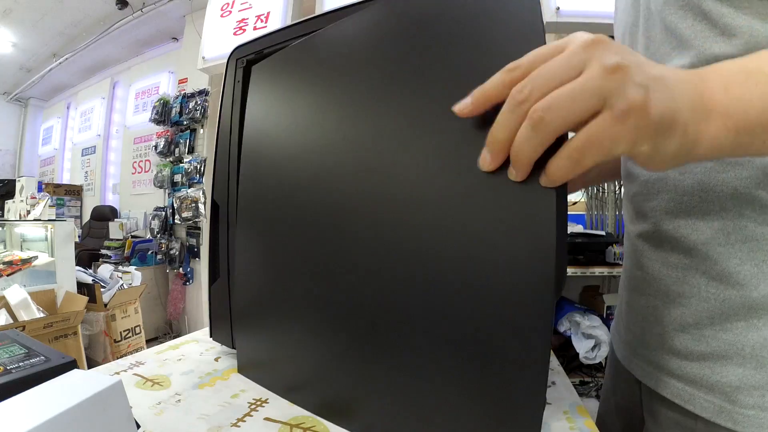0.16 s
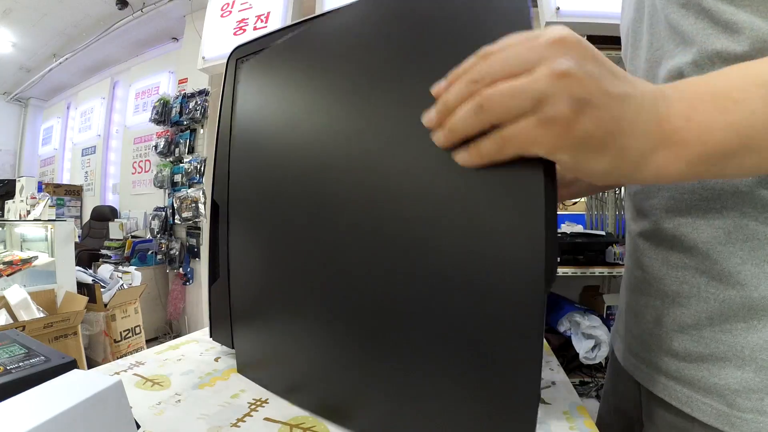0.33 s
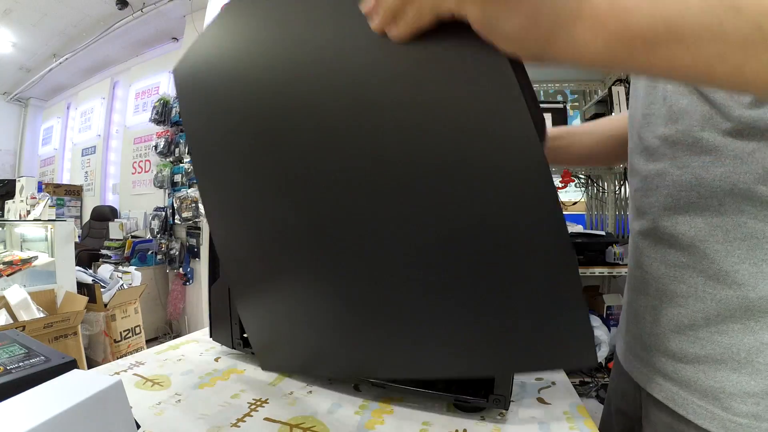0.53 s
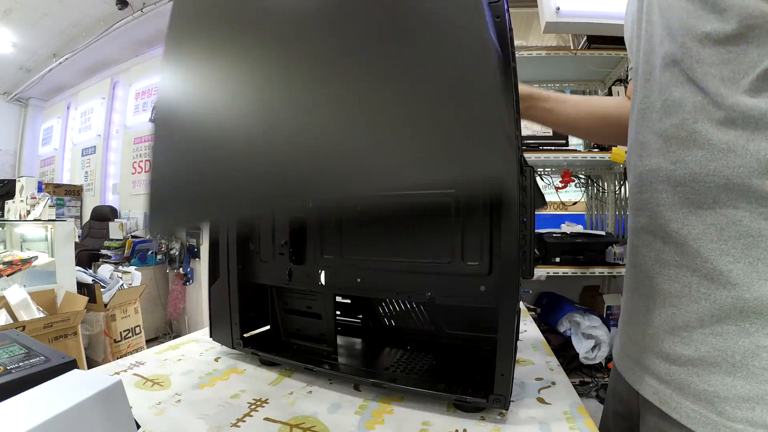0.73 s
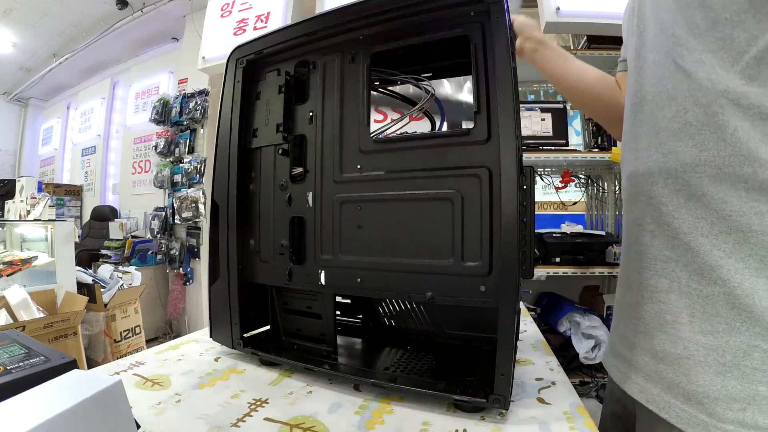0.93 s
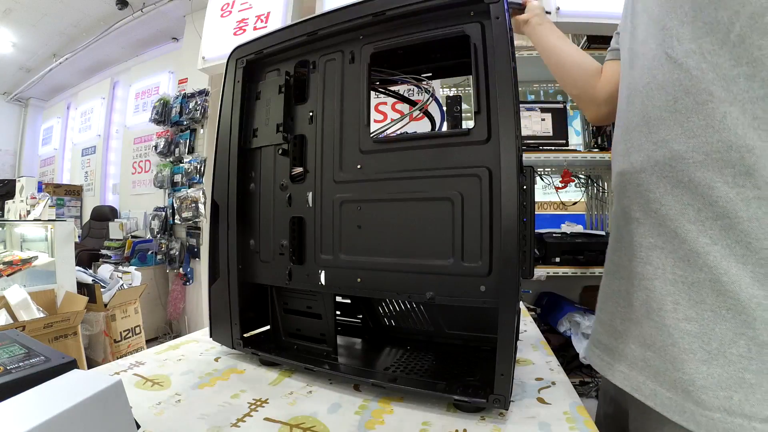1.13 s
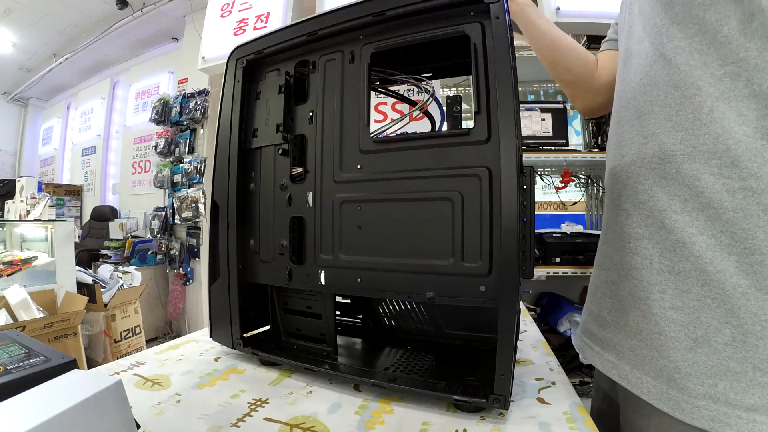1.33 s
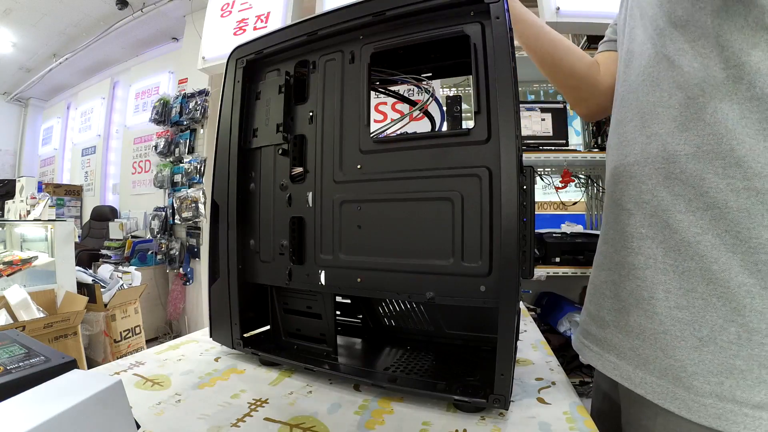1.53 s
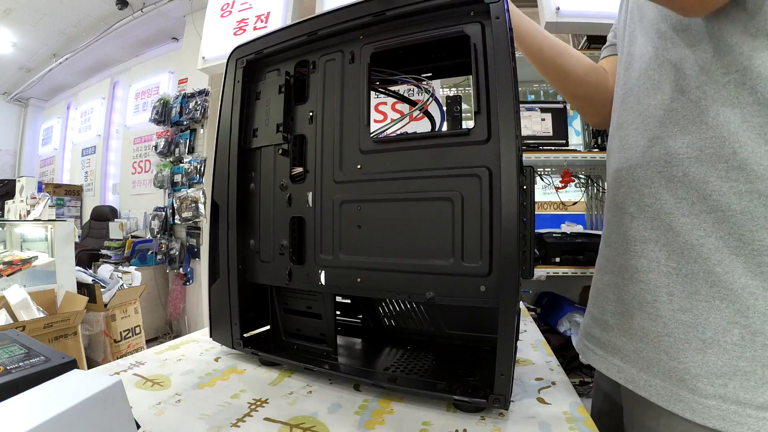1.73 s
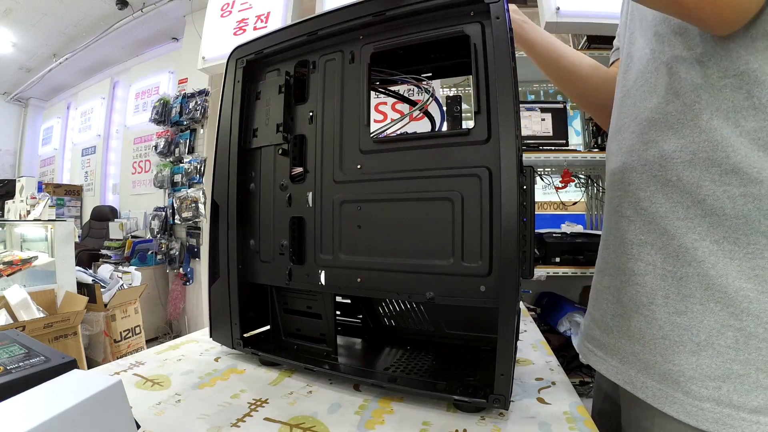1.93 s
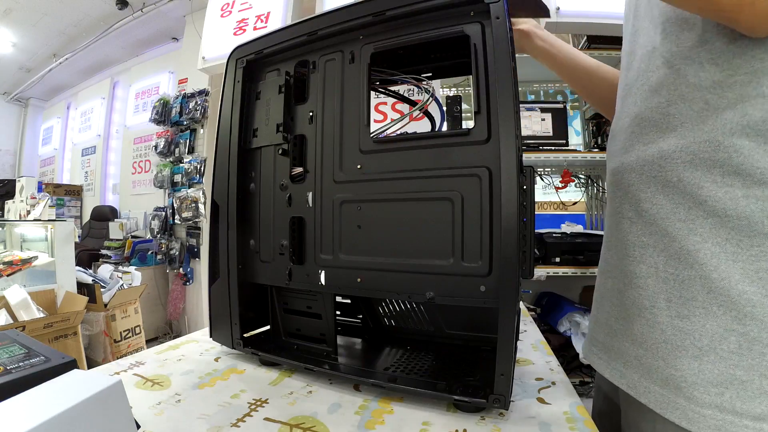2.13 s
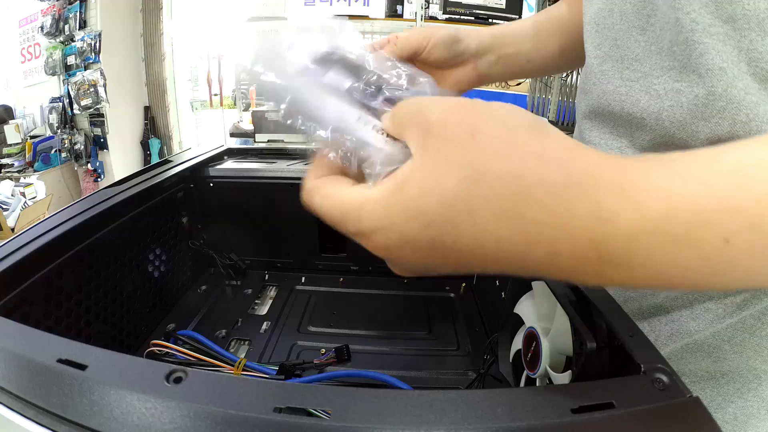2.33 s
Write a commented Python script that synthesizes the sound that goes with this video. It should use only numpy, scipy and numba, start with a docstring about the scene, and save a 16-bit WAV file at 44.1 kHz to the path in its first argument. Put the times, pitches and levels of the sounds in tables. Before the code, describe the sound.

Metal side panel wrenched loose from a hollow case, overloaded bangs up close, later rattling knocks and drag.

```python
"""A sheet-metal side panel is jerked off a computer case close to the microphone: dull thumps that overload it,
a bright clank, a scrape as the edge slides free. Later it is set down further off, with rattling knocks and a drag.
Blows set off a few clear tones plus dense, fading bands of noise; scrapes are irregular clicks through resonances.
Echoes surround panel and knocks, and a quiet workshop rumbles and hisses underneath."""
import sys
import numpy as np
from scipy import signal
from scipy.fft import rfft, irfft
from scipy.io import wavfile
from numba import njit

SR = 44100
rng = np.random.default_rng(int(sys.argv[2]) if len(sys.argv) > 2 else 0)


def materialize(psi):
    """Save the field psi as 16-bit PCM at rate SR to the path in sys.argv[1].

    A 1-D psi becomes a single channel; in a 2-D psi each row is a channel.
    """
    bounded = np.clip(np.atleast_2d(psi).T, -1, 1)
    quanta = np.round(bounded * 32767).astype(np.int16)
    wavfile.write(sys.argv[1], SR, quanta)


N = 104781
T = np.arange(N) / SR  # time of every sample, in seconds

# blows on the panel: start_s, ring_db, contact_ms, dull_thud_db, bright_clank_db, case_thump_db
PANEL_BLOWS = [(0.0, -11.5, 2.37, -21, -27.5, -38), (0.025, -31, 4.5, -27, -36.5, -11.5),
               (0.0947, -26, 0.92, -9.5, -31.5, 9), (0.1361, -23, 1.6, -10.5, -8, -25),
               (0.1769, -8, 1.63, -4.5, -47.5, -4.5), (0.2108, -18.5, 0.66, -4, -35, -2),
               (0.452, -29.5, 0.98, -25.5, -55, -38)]
# setting the panel down: start_s, rattle_db, hollow_knock_db, low_thud_db
SET_DOWN_KNOCKS = [(1.8641, -15, -49, -46), (1.8720, -17.5, -68, -35.5), (1.9206, -22.5, -32.5, -40),
                   (1.927, -22, -53, -26), (1.994, -17, -59, -38), (1.999, -26.5, -33.5, -35),
                   (2.0694, -16, -29, -47), (2.0730, -37, -19.5, -30.5), (2.078, -22, -27.5, -24),
                   (2.350, -32, -73, -35), (2.3582, -35, -41, -43)]
WAVER_HZ = 10.6  # pace at which the panel's ring and the echoes are hurried and delayed
DIP_S, DIP_HALF_S = 2.345, 0.0052  # the level dips to nothing for an instant
GRIT_SPREAD_DB = 2  # scatter of click sizes in slide and drag


def undb(db):
    """Turn decibels into a plain gain."""
    return 10 ** (np.asarray(db) / 20)


def unit(x):
    """Scale a sound to an average strength (rms) of 1."""
    return x / np.sqrt(np.mean(x ** 2))


def fade(seconds, t60):
    """Natural dying away: down by 60 dB after t60 seconds."""
    return np.exp(-np.log(1000) * seconds / t60)


def curve(rows, col=1):
    """One column of a table, joined by straight lines in time."""
    rows = np.array(rows, float)
    return np.interp(T, rows[:, 0], rows[:, col])


def noise():
    """Plain random hiss, equally strong at all pitches."""
    return rng.standard_normal(N)


def band(x, hz, width_hz):
    """Two-pole resonance with gain 1 at its centre."""
    return signal.lfilter(*signal.iirpeak(min(hz, .45 * SR), hz / width_hz, fs=SR), x)


@njit
def sweep(x, hz, width):
    """Resonance whose centre moves; its width is a share of its pitch (state-variable band-pass)."""
    y, b, l = np.empty(len(x)), 0., 0.
    for i in range(len(x)):
        g = np.tan(np.pi * hz[i] / SR)
        v = (b + g * (x[i] - l)) / (1 + g * (g + width))
        b, l, y[i] = 2 * v - b, l + 2 * g * v, width * v
    return y


def clicks(times, db):
    """Single-sample clicks at the given times and levels."""
    x = np.zeros(N)
    places = np.clip((np.asarray(times) * SR).astype(int), 0, N - 1)
    np.add.at(x, places, undb(db))
    return x


def grit(per_s, spread_db):
    """Irregular clicks of scattered size and random direction, rms 1."""
    chance, size = rng.random((N, 2)).T
    happens = chance < per_s / SR
    return unit(happens * undb(-spread_db * np.log(size + 1e-9)) * np.sign(noise()))


def ring(modes):
    """Response of a few clear modes to one push: fading sine tones."""
    return sum(undb(db) * fade(T, t60) * np.sin(2 * np.pi * hz * T) for hz, db, t60 in modes)


def bursts(hits, colour, t60, slope, source):
    """Countless close modes: third-octave bands of the source, started by the hits, each dying at its own rate."""
    colour, out, power = np.array(colour, float), 0, 0
    for hz in 40 * 2 ** np.arange(0, 8.7, 1 / 3):
        level_db = np.interp(np.log(hz), np.log(colour[:, 0]), colour[:, 1], left=-60)
        gain = undb(level_db) * np.sqrt(hz)  # a band grows wider with its pitch
        band_t60 = t60 * (hz / 1000) ** slope  # t60 is given at 1 kHz
        envelope = signal.lfilter([1], [1, -fade(1 / SR, band_t60)], hits)
        grain = unit(band(source(), hz, hz / 3))
        out = out + gain * band(envelope * grain, hz, hz / 2)
        power = power + gain ** 2
    return out / np.sqrt(power)


def panel():
    """Each blow pushes sheet and case for its contact time, so both ring, and sets off a bright clank."""
    # clear tones of the sheet: pitch_hz, level_db, t60_s
    sheet_modes = [(158.8, -6, 0.38), (257, -4.5, 0.63), (334, -7, 0.25), (397.3, -6, 0.31), (575, -6, 0.4),
                   (667, 0, 0.1), (940, -8.5, 0.37)]
    # the hollow case booms briefly: pitch_hz, level_db, t60_s
    case_modes = [(105.3, -11, 0.027), (212.1, 1.5, 0.051), (388, -0.5, 0.043), (584, -3.5, 0.037)]
    # colour of the clank: pitch_hz, level_db_per_hz
    clank_colour = [(400, -12), (700, 4), (1500, 0.5), (2600, 1.5), (3250, -3), (3900, -9), (5000, -8),
                    (9000, -16.5), (15500, -32.5)]
    clank_t60_s, clank_slope = 0.24, -0.0123  # at 1 kHz; power of pitch
    bend_s = 0.00056  # rms shift in time

    blows = np.array(PANEL_BLOWS, float)
    sheet_push, case_push = np.zeros(N), np.zeros(N)
    for start_s, ring_db, contact_ms, _, _, thump_db in blows:
        push = np.hanning(int(contact_ms * SR / 1000) + 3)  # three samples longer, for the soft ends
        push = push / push.sum()
        first = int(start_s * SR)
        sheet_push[first:first + len(push)] -= undb(ring_db) * push
        case_push[first:first + len(push)] -= undb(thump_db) * push
    sheet = signal.fftconvolve(sheet_push, ring(sheet_modes))[:N]
    case = signal.fftconvolve(case_push, ring(case_modes))[:N]
    # the bending sheet hurries and delays its own ring
    bend = bend_s * unit(band(noise(), WAVER_HZ, WAVER_HZ))
    sheet = np.interp(T + bend, T, sheet)
    clank = bursts(clicks(blows[:, 0], blows[:, 4]), clank_colour, clank_t60_s, clank_slope, noise)
    return sheet + case + clank


def flexing():
    """The whole sheet flexes, pumps air and booms where it snaps through: damped swings, inward first. The last
    row is a deep, slow swing that starts as the level dips."""
    # booms, and a deep swing as the level dips: start_s, level_db, pitch_hz, t60_s
    flexes = [(0.096, 2.5, 87, 0.066), (0.133, -0.5, 41.6, 0.22), (0.1764, -1, 339, 0.088),
              (0.2113, 1, 248.6, 0.084), (0.2102, -6, 157, 0.1), (0.241, -9, 240.5, 0.096),
              (0.264, -17, 269.5, 0.22), (0.45, -23, 44.2, 0.47), (0.673, -22, 30.3, 0.19),
              (2.345, -24, 25, 0.91)]
    out = 0
    for start_s, level_db, pitch_hz, t60_s in flexes:
        swing = -np.roll(ring([(pitch_hz, level_db, t60_s)]), int(start_s * SR))
        out = out + swing * (T >= start_s)
    return out


def thuds():
    """Dull dense body of the sheet under every blow and knock; its low modes die slowest."""
    # colour of the thuds: pitch_hz, level_db_per_hz
    thud_colour = [(29, -13), (50, -6.5), (275, 0.5), (369, -6), (639, -9), (1240, -12.5), (1850, -31),
                   (4000, -47)]
    thud_t60_s, thud_slope = 0.11, -0.3  # at 1 kHz; power of pitch
    blows, set_downs = np.array(PANEL_BLOWS, float), np.array(SET_DOWN_KNOCKS, float)
    hits = clicks(blows[:, 0], blows[:, 3]) + clicks(set_downs[:, 0], set_downs[:, 3])
    return bursts(hits, thud_colour, thud_t60_s, thud_slope, noise)


def slide():
    """The edge sticks and slips out of its rail: clicks in a resonance that mostly rises as it comes free."""
    # edge leaving its rail: start_s, level_db, resonance_hz
    path = [(0.422, -78, 560), (0.432, -42.5, 640), (0.449, -43, 900), (0.46, -45.5, 715), (0.50, -37, 880),
            (0.53, -41, 1110), (0.553, -44, 1338), (0.563, -53, 1310), (0.63, -62, 1150)]
    clicks_per_s, width, hiss_db = 3000, .28, -1  # width as a share of the pitch
    slips = grit(clicks_per_s, GRIT_SPREAD_DB)
    pitch = curve(path, col=2)
    tone = unit(sweep(sweep(slips, pitch, 2 * width), pitch, width))
    hiss = undb(hiss_db) * unit(band(band(slips, 730, 1250), 730, 900))
    sliding = (T > path[0][0]) * (T < path[-1][0])
    return sliding * undb(curve(path)) * (tone + hiss)


def ticks():
    """Ticks and short rings: puffs of noise in a narrow or wide band, fading from a sudden start."""
    # puffs: start_s, level_db, pitch_hz, width_hz, t60_s
    puffs = [(0.095, -22, 2200, 1500, .05), (0.1355, -7, 3300, 800, 0.08), (0.451, -33, 1500, 2000, 0.14),
             (0.651, -45, 1570, 300, 0.06), (0.652, -34, 1800, 5000, 0.025), (0.656, -49.5, 280, 60, 0.78),
             (0.936, -45, 3000, 4000, 0.014), (1.661, -45, 6500, 7000, 0.05),
             (2.0694, -18, 5000, 6000, 0.09), (2.0705, -26, 840, 150, 0.08)]
    out = 0
    for start_s, level_db, pitch_hz, width_hz, t60_s in puffs:
        envelope = fade(np.maximum(T - start_s, 0), t60_s) * (T >= start_s)
        grain = unit(band(band(noise(), pitch_hz, 2 * width_hz), pitch_hz, width_hz))
        out = out + undb(level_db) * envelope * grain
    return out


def knocks():
    """Gritty rattle of the sheet being set down: a crack at first contact, then broad resonances."""
    # colour of the rattle: pitch_hz, level_db_per_hz
    rattle_colour = [(150, -16), (450, -6), (640, -7), (770, 5.5), (1310, -7.5), (1480, 0), (4170, -6),
                     (4630, -1), (10400, -17.5), (15500, -50)]
    # broad resonances added to the rattle: pitch_hz, width_hz, level_db
    rattle_peaks = [(760, 120, -4), (1100, 150, -8), (1900, 300, 0), (2800, 400, -2)]
    rattle_t60_s, rattle_slope, spread_db = .06, -.05, 2.0  # at 1 kHz; power of pitch; scatter of clicks
    crack_db, crack_hz, crack_width_hz = 11, 2200, 4000  # level over the rattle

    rows = np.array(SET_DOWN_KNOCKS, float)
    grains = grit(12000, spread_db)
    hits = clicks(rows[:, 0], rows[:, 1])
    rattle = bursts(hits, rattle_colour, rattle_t60_s, rattle_slope, lambda: grains * noise())
    rattle += band(clicks(rows[:, 0], rows[:, 1] + crack_db), crack_hz, crack_width_hz)
    return rattle + sum(undb(db) * band(rattle, hz, width) for hz, width, db in rattle_peaks)


def hollow():
    """A low knock under the rattle: two tones rung by each contact, then stopped short by the hand."""
    # hollow tones: pitch_hz, level_db, t60_s
    hollow_modes = [(200.7, 0.5, 0.18), (143, -6, 0.29)]
    held_s = 0.057  # then the hand stops it
    rows = np.array(SET_DOWN_KNOCKS, float)
    stopped = ring(hollow_modes) * np.exp(-(T / held_s) ** 6)
    return signal.fftconvolve(clicks(rows[:, 0], rows[:, 2]), stopped)[:N]


def drag():
    """Chattering stick-slip clicks into the sheet's resonances; the upper ones swell as it presses harder."""
    # course of the drag: start_s, level_db, brightening_db
    path = [(2.14, -60, -6), (2.17, -43, -8), (2.226, -38, -9), (2.27, -36, -6), (2.294, -34, -5),
            (2.306, -36, 1.5), (2.328, -41, -3), (2.345, -54, 0)]
    # resonances of the dragged sheet: pitch_hz, width_hz, level_db
    peaks = [(893, 320, 3), (1640, 550, 5), (2905, 130, -4.5), (4450, 430, -7)]
    clicks_per_s, chatter_db, hiss_db, low_db = 3000, 1, -5.5, -4.5
    glide_per_s = 1.5  # the first resonance climbs by this share of its pitch each second, for 0.2 s

    chatter = undb(chatter_db * unit(band(noise(), 83, 72)))
    slips = grit(clicks_per_s, GRIT_SPREAD_DB) * chatter
    hz, width, db = peaks[0]
    climb = hz * (1 + glide_per_s * np.clip(T - path[2][0], -.1, .1))
    gliding = undb(db) * unit(sweep(sweep(slips, climb, 2 * width / hz), climb, width / hz))
    low = undb(low_db) * unit(band(band(slips, 420, 270), 420, 270))
    upper = undb(hiss_db) * unit(band(band(noise(), 4100, 5900), 5200, 7900))
    for hz, width, db in peaks[1:]:
        upper = upper + undb(db) * unit(band(band(slips, hz, 2 * width), hz, width))
    dragging = (T > path[0][0]) * (T < DIP_S)
    return dragging * undb(curve(path)) * (gliding + low + undb(curve(path, col=2)) * upper)


def echoes(near, far):
    """Room echoes: a dense fading tail, stronger for far sounds, wavering as panel and hands move."""
    t60_s, slope, near_db, far_db = 0.58, -0.072, -13, -4.5  # t60 at 1 kHz; power of pitch
    drift_s = .00012  # rms shift in time
    tail = bursts(clicks([.004], [0]), [(40, 0), (16000, 0)], t60_s, slope, noise)
    tail = tail / np.sqrt(np.sum(tail ** 2))
    room = signal.fftconvolve(undb(near_db) * near + undb(far_db) * far, tail)[:N]
    drift = drift_s * unit(band(noise(), WAVER_HZ, WAVER_HZ))
    return np.interp(T + drift, T, room)


def shop():
    """Filtered noise: steady hiss and hum of the room, a deep wavering rumble, a faint rustle."""
    # colour of the room: pitch_hz, level_db_per_hz
    room_colour = [(26, -35), (45, 3), (129, -16), (220, -13), (262, -17), (866, -24.5), (2040, -28),
                   (14100, -45), (15500, -42.5)]
    # deep rumble: start_s, level_db
    rumble_level = [(0.5, -35), (2.332, -42.5), (2.37, -37)]
    # treble swells as the hands move: start_s, level_db
    rustle_level = [(0.6, -56), (1.0, -63), (1.14, -54.5), (1.22, -63.5), (1.85, -88)]
    hiss_db, rumble_hz, rumble_width_hz = -48.5, 23.77, 10.8

    pitches, rows = np.fft.rfftfreq(N, 1 / SR), np.array(room_colour, float)
    colour_db = np.interp(np.log(pitches + 1), np.log(rows[:, 0]), rows[:, 1], left=-60)
    hiss = unit(irfft(rfft(noise()) * undb(colour_db), N))
    rumble = unit(band(band(noise(), rumble_hz, rumble_width_hz), rumble_hz, rumble_width_hz))
    rustle = unit(band(noise(), 2500, 4200))
    return undb(hiss_db) * hiss + undb(curve(rumble_level)) * rumble + undb(curve(rustle_level)) * rustle


def scene():
    """Mix all sources, alike on both channels; the flexing booms and the deep swing stay outside the echoes and
    the dip."""
    near = panel() + thuds() + slide() + ticks() + hollow()
    far = knocks() + drag()
    dip = np.clip(np.abs(T - DIP_S) / DIP_HALF_S, 0, 1)
    mono = (near + far + echoes(near, far) + shop()) * dip + flexing()
    return np.array([mono, mono])


def record(dry):
    """One microphone on two channels: its level is cut off flat when overloaded, then the top is filtered away."""
    # steady offset of each channel, one row a channel: offset (full scale is 1)
    offsets = [
        [-.0128],
        [.0054],
    ]
    top_hz = 15700
    overloaded = np.clip(dry + np.array(offsets), -1, 1)
    top_cut = signal.ellip(8, .1, 70, top_hz, fs=SR, output="sos")
    return np.clip(signal.sosfilt(top_cut, overloaded), -1, 1)


dry = scene()
out = record(dry)
materialize(out)
```